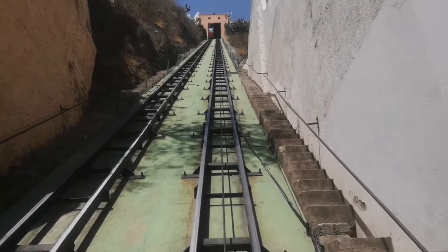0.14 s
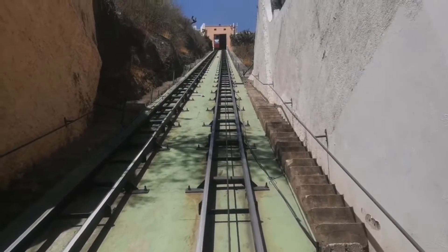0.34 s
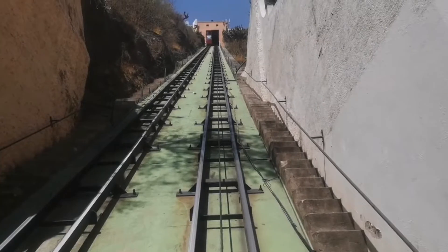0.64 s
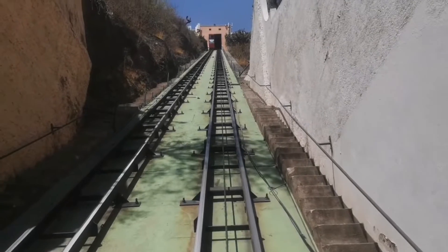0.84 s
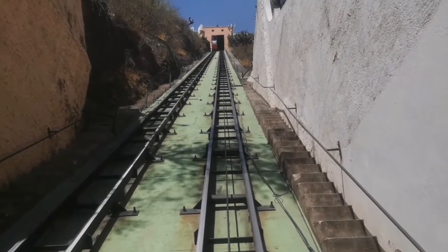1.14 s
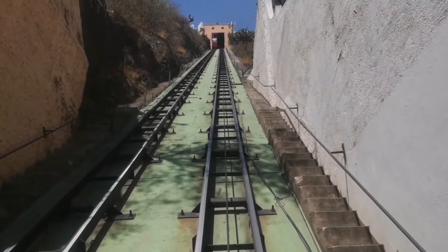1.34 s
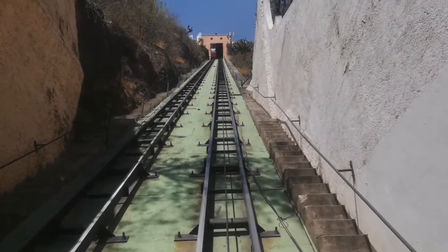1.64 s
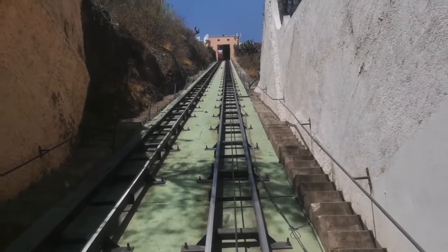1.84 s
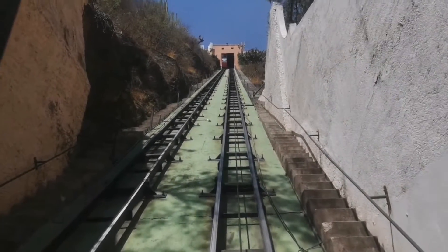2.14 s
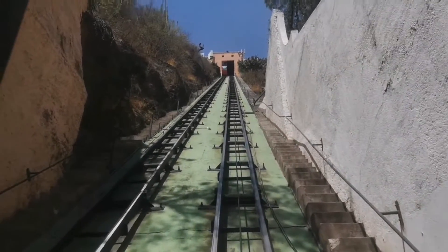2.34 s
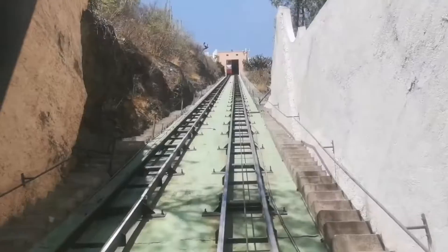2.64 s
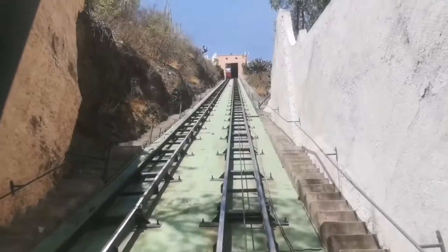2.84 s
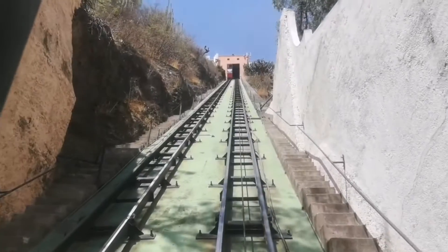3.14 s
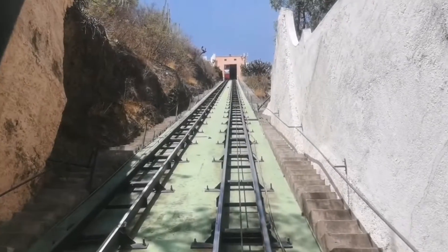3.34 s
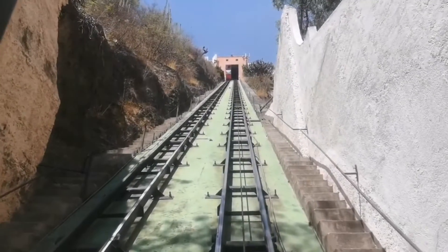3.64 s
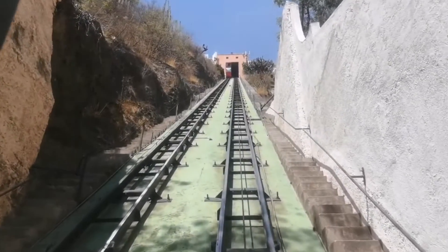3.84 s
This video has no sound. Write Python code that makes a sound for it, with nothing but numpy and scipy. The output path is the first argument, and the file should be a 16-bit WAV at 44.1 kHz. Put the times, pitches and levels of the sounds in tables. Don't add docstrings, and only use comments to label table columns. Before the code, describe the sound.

Loose panels and glass clatter in three jolts as a cable-hauled cabin rumbles uphill

```python
import sys
import numpy as np
from scipy import signal
from scipy.fft import rfft, irfft
from scipy.io import wavfile
from scipy.ndimage import uniform_filter1d

SR = 44100
rng = np.random.default_rng(int(sys.argv[2]) if len(sys.argv) > 2 else 0)


def boost(x):
    u = np.asarray(x, float) / 20
    return 10 ** u


def materialize(psi):
    bounded = np.clip(np.atleast_2d(psi).T, -1, 1)
    quanta = np.round(bounded * 32767).astype(np.int16)
    wavfile.write(sys.argv[1], SR, quanta)


N = 176400

# time_s, sway_db, bounce_db, drone_db, roar_db
MOTION = [(0, -14, -23.5, -35, -47), (.1, -13.5, -17.5, -26, -34), (.3, -17.5, -15.5, -23, -38),
          (.56, -13.5, -22, -28, -44), (.8, -20.5, -23, -27, -44), (.97, -11, -19, -25.5, -44.5),
          (1.1, -7, -23, -24, -40.5), (1.4, -16.5, -19.5, -24, -43.5), (1.53, -12.5, -14, -23.5, -42),
          (1.75, -10, -24.5, -25.5, -46), (2.1, -16.5, -19.5, -25, -44), (2.4, -26, -30.5, -27.5, -41),
          (2.7, -15, -19, -25, -42), (2.97, -12.5, -10.5, -25, -39.5), (3.35, -14.5, -20.5, -26, -42),
          (3.65, -24.5, -28.5, -27.5, -39), (4, -18, -29.5, -24.5, -40.5)]
# pitch_hz, width_hz, level_db
SWAY_MODES = [(21.8, 10, -5.5), (36.75, 8.24, -1), (50.8, 13.2, -7)]
# pitch_hz, width_hz, level_db
BOUNCE_MODES = [(65.5, 10.7, -5), (77.7, 6, -0.5), (92.6, 14.8, -6)]
# pitch_hz, width_hz, level_db
FLOOR_MODES = [(121, 13.6, 0.5), (146.2, 26.6, -2), (183.1, 28.5, -2.5), (248.6, 32, -6.5), (299, 29, -7),
               (351, 63, -15.5)]
# pitch_hz, density_db (per Hz)
ROAR_SPECTRUM = [(210, -48), (350, -3), (502, -8), (897, -10), (1330, -14.5), (2060, -12.5), (2910, -26.5),
                 (7930, -45), (14800, -57)]
# pitch_hz, width_hz, level_db
RAIL_MODES = [(880, 230, -2), (1800, 130, -1.5), (2110, 330, -4)]
# pitch_hz, correlation (-1 to 1)
LIKENESS = [(40, .9997), (75, 1), (130, 0.96), (290, 0.86), (630, -0.36), (1370, 0.068)]
# start_s, level_db, tick_db, knock_db
FIRST_JOLT = [(0.046, -29, -31, -0.5), (0.0832, -22, -20.5, -9.5), (0.1342, -22, -21, -3),
              (0.165, -35, -14.5, -16), (0.198, -48, -8, -20), (0.24, -17, -19, -6.5),
              (0.2573, -24.5, -9, -1.5), (0.2861, -23, -19, -2), (0.311, -33.5, -18, -1),
              (0.3951, -25, -17.5, -2), (0.415, -31, -13.5, 0), (0.439, -26.5, -28.5, -2.5),
              (0.4915, -27, -22.5, -9), (0.5552, -30.5, -15.5, -5), (0.6667, -50.5, -1.5, -19),
              (0.6973, -36.5, -18, -1), (0.7435, -36.5, -13.5, 5.5), (0.828, -36, -14.5, -2)]
# start_s, level_db, tick_db, knock_db, chatter_s
SECOND_JOLT = [(0.953, -24.5, -28, 0, 0.048), (0.986, -35.5, -15, -4, 0.044),
               (1.0306, -32.5, -21.5, -2, 0.022), (1.09, -34, -30, -10, .01),
               (1.1203, -31.5, -18.5, -1.5, 0.032), (1.1866, -36.5, -15, 6, 0.018),
               (1.2047, -28, -25.5, 1, .012), (1.258, -35, -18, 2.5, 0.024), (1.3044, -36, -22, -3, 0.028),
               (1.336, -31, -26, -6, 0.028), (1.3586, -28, -31.5, -8, 0.022),
               (1.415, -31.5, -20, -1, 0.023), (1.504, -26, -35, 0, 0.063), (1.541, -28.5, -17, 0.5, 0.038),
               (1.5805, -32, -28, 2.5, .02), (1.6382, -31, -25, 1, 0.022), (1.693, -36.5, -40, 4, 0.016),
               (1.864, -36.5, -21, 0.5, .03), (2.082, -45, -17, 5.5, .038)]
# start_s, level_db, tick_db, knock_db, chatter_s
THIRD_JOLT = [(2.64, -30.5, -21, 4, 0.069), (2.675, -28, -21.5, -2.5, 0.047),
              (2.7061, -19.5, -17, -8, 0.037), (2.739, -23, -11, -12, 0.022),
              (2.7648, -15, -17.5, -11.5, 0.031), (2.799, -21, -12, -6.5, 0.0037),
              (2.859, -26, -14.5, -3, 0.019), (2.9357, -31, -8, -3, 0.042),
              (2.943, -19, -18.5, -5.5, 0.018), (2.9593, -19.5, -21, -6, 0.01),
              (3.087, -38.5, -14.5, -15, 0.0091), (3.1804, -30, -42, -8, 0.0076),
              (3.212, -41, -18, -37, 0.0071), (3.295, -36.5, -19.5, -21, 0.028),
              (3.3555, -33, -21, -13, 0.058), (3.6227, -42, 3, -21, 0.038), (3.796, -32, -12.5, -30, 0.049)]
# start_s, level_db, tick_db, knock_db, chatter_s
LATCH_BLOWS = [
    (3.036, -21.5, -23.5, -17, 0.011),
    (3.1345, -19.5, -13.5, -3, 0.004),
    (3.121, -25.5, -16, -11, 0.006),
]
# pitch_hz, width_hz, level_db
PANEL_MODES = [(1583, 230, -4.5), (1910, 129, 2), (2202, 250, -2), (2856, 227, -4.5), (3610, 960, -13.5)]
# pitch_hz, width_hz, level_db
FRAME_MODES = [(321, 45, -0.5), (486, 180, -2), (773, 420, -4.5), (973, 128, -1), (1255, 155, -8.5)]
# pitch_hz, width_hz, level_db
GLASS_MODES = [(5380, 170, 7), (8440, 53, 3)]
# pitch_hz, density_db (per Hz)
GLASS_SPECTRUM = [(4000, -8), (4800, -1), (6300, -7.5), (8000, -3), (10000, -11), (13000, -20.5),
                  (15000, -30)]
# start_s, level_db, pitch_hz, t60_s
RINGS = [(.28, -27, 340, 0.44), (.955, -14, 222, 0.19), (.745, -26.5, 530, 0.14), (.953, -33.5, 1230, 0.24),
         (0.82, -31, 1300, .1), (.669, -49, 7700, .13), (.746, -47.5, 8520, .2), (1.503, -30.5, 1010, 0.33),
         (1.505, -8.5, 130, 0.22), (1.2, -23, 280, 0.4), (3.66, -23.5, 195, 1), (2.45, -26.5, 210, 0.77),
         (2.708, -9.5, 2420, 0.036), (2.708, -24, 3600, 0.068), (3.1, -33, 810, 0.08),
         (3.554, -31, 2080, 0.29), (3.59, -36, 2200, 0.65), (3.555, -40, 2950, 0.11),
         (3.797, -26, 2000, 0.43), (3.797, -39.5, 2950, 0.35)]
# start_s, peak_db, pitch_hz
TICKS = [(.0664, -44, 7000), (.083, -39, 6500), (.130, -35, 5500), (.1965, -37, 9000), (.2407, -33, 6000),
         (0.2605, -25, 6500), (0.2888, -34, 6500), (.350, -40.5, 7500), (.419, -39, 7500),
         (0.439, -41.5, 7000), (.5018, -38.5, 8600), (.558, -42.5, 7500), (.5986, -46.5, 7000),
         (.651, -48.5, 8500), (.6696, -45, 8500), (.699, -42.5, 7400), (0.744, -46, 8400),
         (.832, -40, 7400), (1.1222, -43.5, 7500), (1.184, -45.5, 8000), (1.2027, -41, 7000),
         (1.2426, -44.5, 6500), (1.301, -44.5, 8000), (1.352, -43, 5800), (1.418, -47.5, 8000),
         (1.5438, -39.5, 6500), (1.5455, -44, 12000), (1.5993, -41, 4600), (1.64, -48.5, 6000),
         (1.7537, -57, 5500), (1.8557, -54, 6500), (2.4338, -52.5, 6500), (2.4526, -50.5, 8500),
         (2.6385, -46.5, 9000), (2.7664, -32, 9500), (2.7994, -26, 6500), (2.99, -43.5, 6500),
         (3.0824, -42.5, 9000), (3.1343, -28, 6500), (3.136, -36, 12500), (3.2115, -46, 8500),
         (3.3354, -46, 8500), (3.355, -41.5, 9000), (3.518, -52, 7500), (3.5537, -45.5, 6000),
         (3.7962, -39, 5400), (3.7956, -50, 11800)]
CABIN_T60_S = 0.37
GLASS_LEFT_DB = 3.5


def evened(x):
    return x / np.sqrt(np.mean(x ** 2) + 1e-20)


def read(points, hz):
    f, value = np.transpose(points)
    return np.interp(np.log(hz + 1), np.log(f + 1), value)


def follow_motion(column):
    rows = np.array(MOTION)
    return boost(np.interp(np.arange(N) / SR, rows[:, 0], rows[:, column]))


def modes(table, hz):
    response = 0
    for k, (f, width, db) in enumerate(table):
        resonance = 1j * hz * width / (f ** 2 - hz ** 2 + 1j * hz * width)
        response = response + (-1) ** k * boost(db) * resonance
    return response


def pair(size):
    hz = np.fft.rfftfreq(size, 1 / SR)
    a, b = rfft(rng.standard_normal((2, size)))
    half = np.arccos(np.clip(read(LIKENESS, hz), -1, 1)) / 2
    shared, apart = np.cos(half) * a, np.sin(half) * b
    return hz, np.array([shared + apart, shared - apart])


def struck(force, colour):
    size = force.shape[1]
    return irfft(rfft(force) * colour / np.linalg.norm(colour) * np.sqrt(len(colour)), size)


def lean_left(db):
    return np.array([[db], [-db]]) / 2


def body():
    out = 0
    span = int(0.23 * SR)
    for table, column, firm in ((SWAY_MODES, 1, 0.23), (BOUNCE_MODES, 2, 0.23), (FLOOR_MODES, 3, 0.1)):
        hz, z = pair(N)
        x = evened(irfft(z * abs(modes(table, hz)) ** 1.377, N))
        swing = uniform_filter1d(uniform_filter1d((x ** 2).mean(0), span), span)
        out = out + follow_motion(column) * evened(x / (swing + 0.05) ** firm)
    return out


def roar():
    patchy_db, flicker_db = 2.5, 0.65
    hz, z = pair(N)
    colour = boost(read(ROAR_SPECTRUM, hz)) * (1 + abs(modes(RAIL_MODES, hz))) * (hz > 330)
    z = signal.stft(irfft(z * colour, N), nperseg=512, noverlap=384)[2]
    field = rng.standard_normal(z.shape[1:])
    patches = evened(uniform_filter1d(uniform_filter1d(field, size=6, axis=0), size=40, axis=1))
    flicker = evened(uniform_filter1d(rng.standard_normal(z.shape[2]), size=4))
    z = z * boost(patchy_db * patches + flicker_db * flicker)
    x = signal.istft(z, nperseg=512, noverlap=384)[1][:, :N]
    return boost(4.0) * follow_motion(column=4) * evened(x)


def ring(level_db, hz, t60_s, size=12000):
    t, turn = np.arange(size) / SR, rng.random(3)
    lag = np.array([[0], [np.arccos(np.clip(read(LIKENESS, hz), -1, 1))]])
    tone = np.sin(2 * np.pi * (hz * t + turn[0]) - lag)
    tone = tone + 0.44 * np.sin(2 * np.pi * (1.05 * hz * t + turn[1]) + lag)
    if hz > 1000:
        drift = uniform_filter1d(rng.standard_normal((2, size)), int(24 * SR / hz), axis=1)
        tone = tone * boost(3 * evened(drift))
    rise = np.minimum(t * hz / 2.6, 1)
    fade = np.minimum(t[::-1] / 0.086, 1)
    return boost(level_db - 60 * t / t60_s) * rise * fade * tone


def tick(peak_db, hz, size=6000):
    t = np.arange(size) / SR
    f, z = pair(size)
    contact = boost(-60 * t / 0.043)
    tail = boost(-16.5 - 60 * t / CABIN_T60_S)
    shape = (contact + tail) * np.minimum(t / 0.00074, 1)
    colour = modes([(hz, 0.74 * hz, 0)], f) ** 2 / (1 + 1j * f / 13000) ** 2
    burst = struck(irfft(z, size) * shape, colour)
    fade = np.minimum(t[::-1] / 0.046, 1) ** 2
    return burst * boost(peak_db - 2 + lean_left(GLASS_LEFT_DB)) * fade


def rattle(level_db, tick_db, knock_db, chatter_s=0.038, size=12000):
    blows_per_s, blow_spread_db, blow_s, rub = 700, 3, 0.0012, 0.35
    t, hz = np.arange(size) / SR, np.fft.rfftfreq(size, 1 / SR)
    blows = (rng.random(size) < blows_per_s / SR) * boost(blow_spread_db * rng.standard_normal(size))
    blows[30] = 2.2
    force = rub + signal.lfilter([1], [1, -np.exp(-1 / (blow_s * SR))], blows)
    late = np.maximum(t - chatter_s, 0)
    contact = force * boost(-60 * late / 0.11 - 300 * t) * np.minimum(t / 0.0011, 1)
    tail = boost(-60 * late / CABIN_T60_S) * (1 - np.exp(-t / 0.0032))

    detune = rng.uniform(0.906, 1.086, 8)

    def detuned(table):
        return modes([(f * d, width, db) for (f, width, db), d in zip(table, detune)], hz)

    dull = 1 / (1 + 1j * hz / 5500) ** 4
    glass = boost(read(GLASS_SPECTRUM, hz)) * (hz > 3000) * (1 + detuned(GLASS_MODES))
    parts = (  # colour, part_db, left_db, cabin_db
        (detuned(PANEL_MODES) * dull, -10.5, 3, -4),
        (detuned(FRAME_MODES) * dull, -7.5 + knock_db, 0, -4),
        (glass, -4 + tick_db, GLASS_LEFT_DB, -10))
    out = 0
    for colour, part_db, left_db, cabin_db in parts:
        noise = irfft(pair(size)[1], size)
        sound = struck(noise * (contact + boost(cabin_db) * tail), colour)
        out = out + sound * boost(level_db + part_db + lean_left(left_db))
    return out * np.minimum(t[::-1] / 0.03, 1) ** 2


def scene():
    mix = np.zeros((2, N + 12000))
    mix[:, :N] = body() + roar()
    rattles = FIRST_JOLT + SECOND_JOLT + THIRD_JOLT + LATCH_BLOWS
    for source, rows in ((ring, RINGS), (tick, TICKS), (rattle, rattles)):
        for start_s, *row in rows:
            sound = source(*row)
            mix[:, round(start_s * SR):][:, :sound.shape[1]] += sound
    return mix[:, :N]


def band_limit(x):
    return signal.sosfilt(signal.butter(12, 15000, fs=SR, output="sos"), x)


def record(dry):
    return band_limit(1.311 * np.tanh(dry / 1.297))


dry = scene()
out = record(dry)
materialize(out)
```